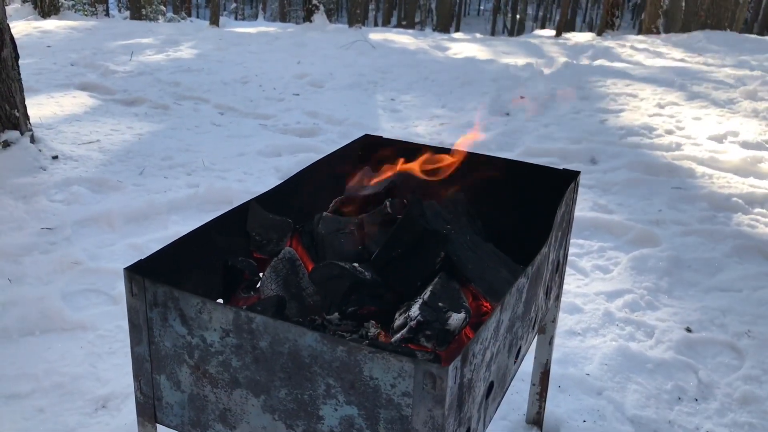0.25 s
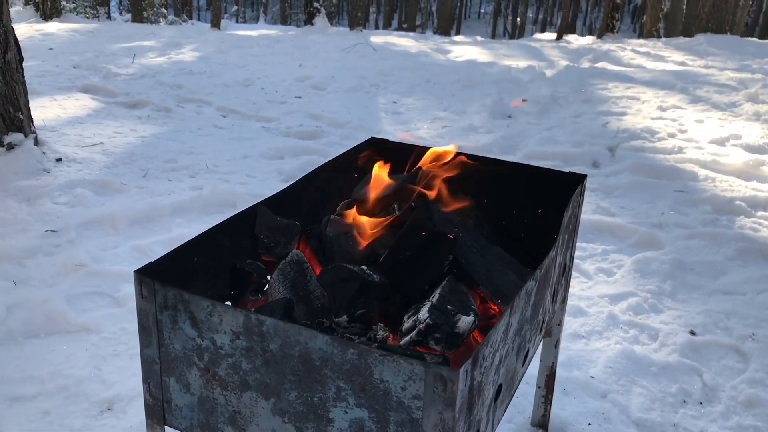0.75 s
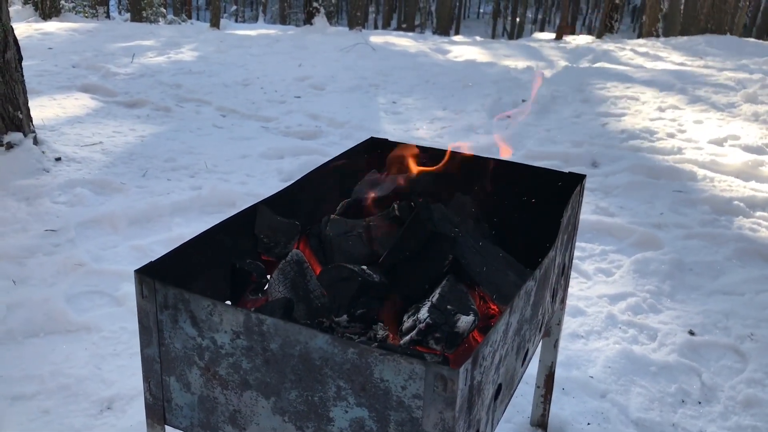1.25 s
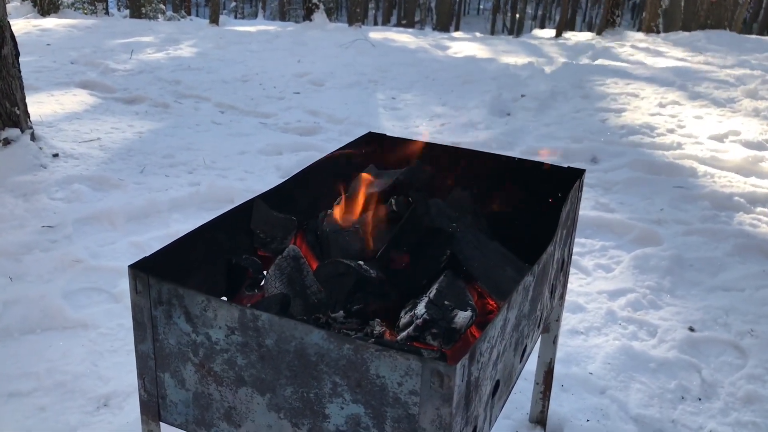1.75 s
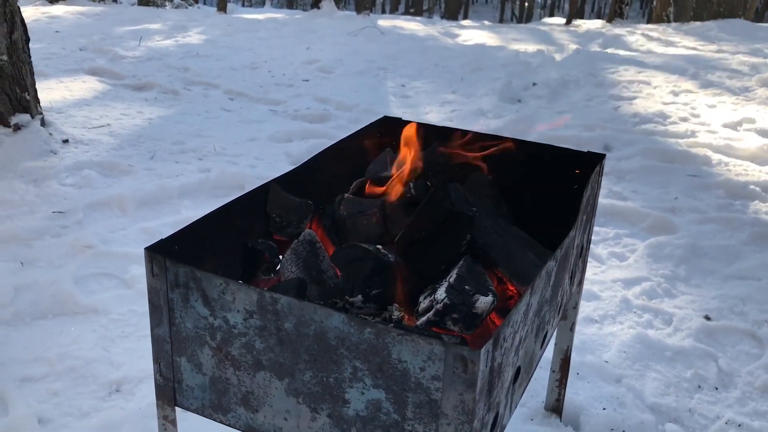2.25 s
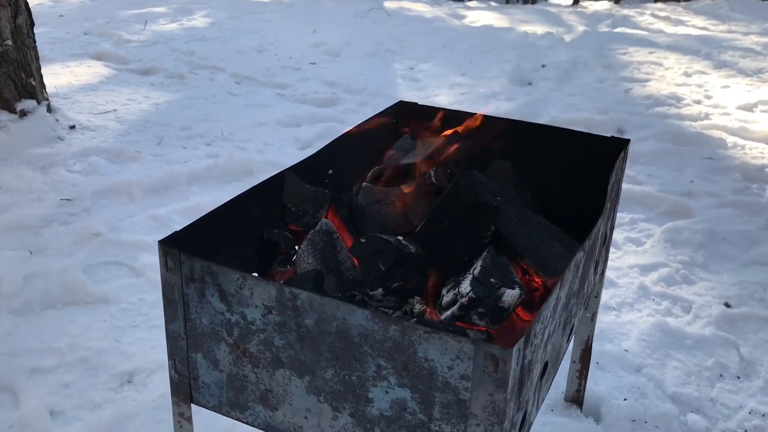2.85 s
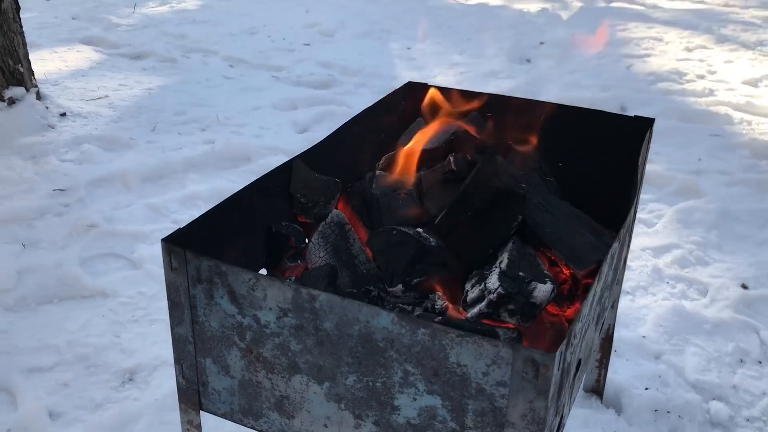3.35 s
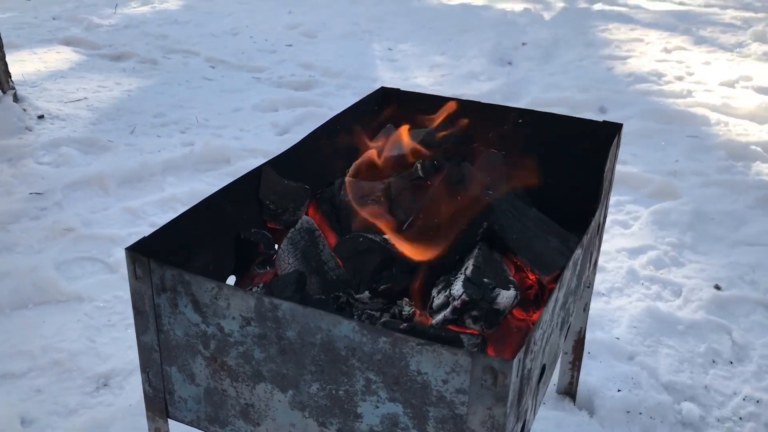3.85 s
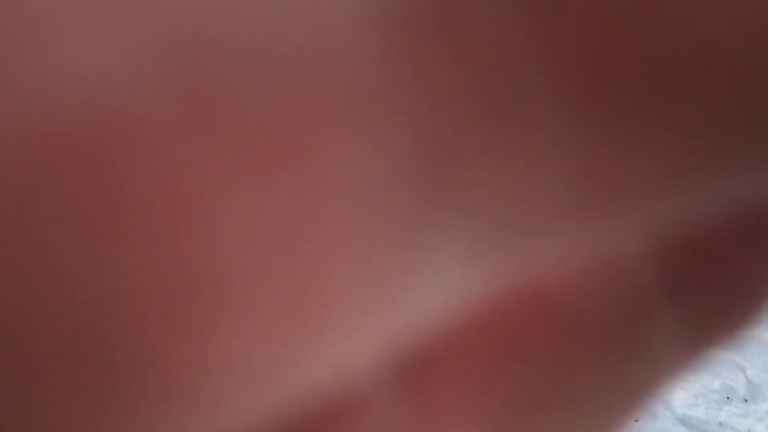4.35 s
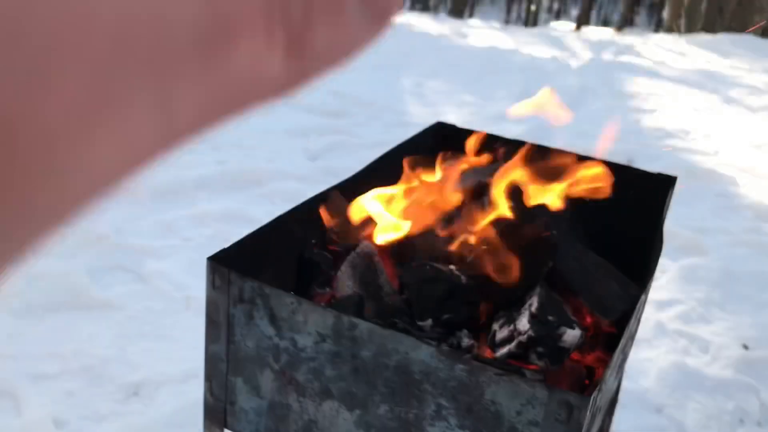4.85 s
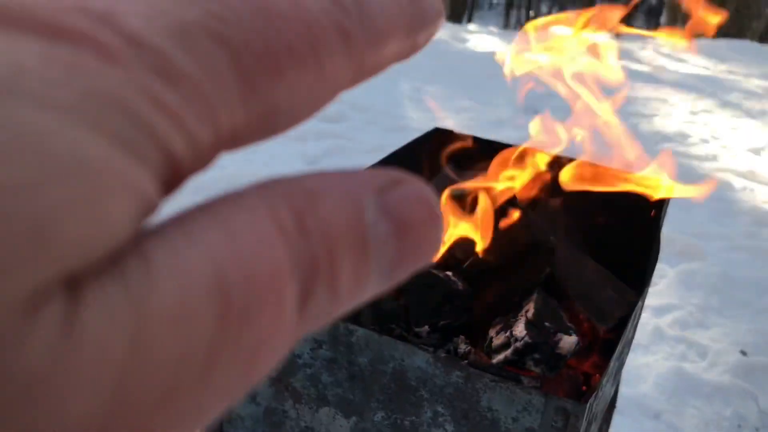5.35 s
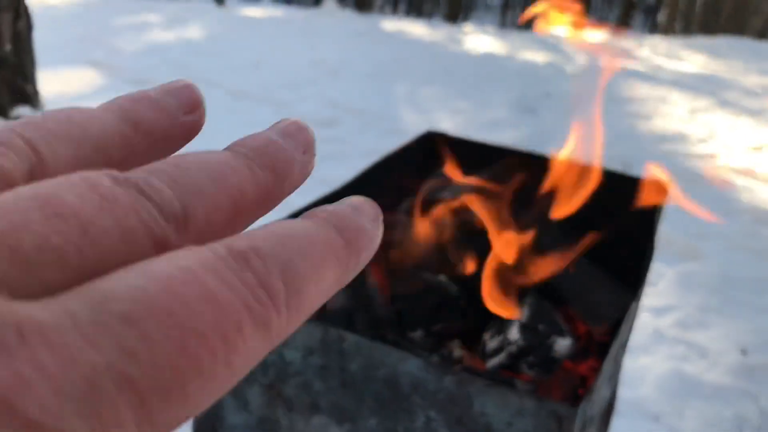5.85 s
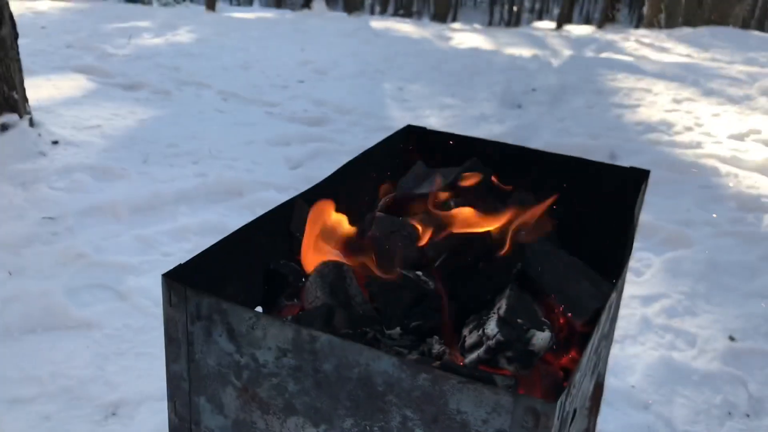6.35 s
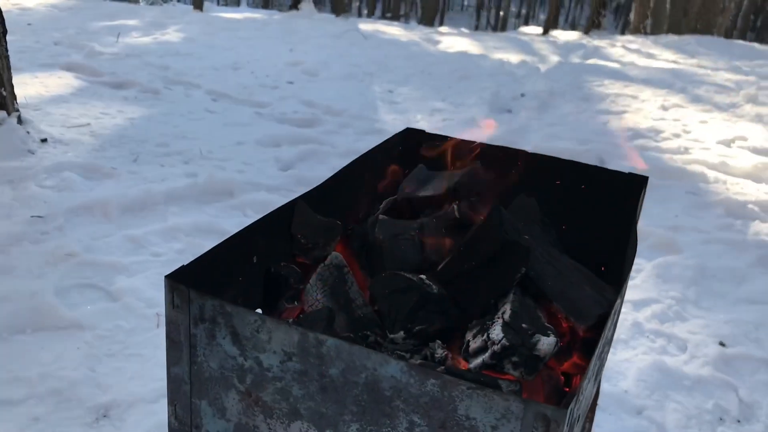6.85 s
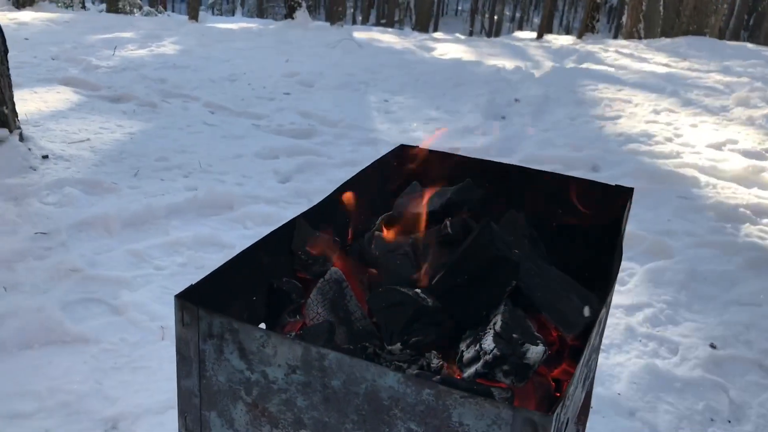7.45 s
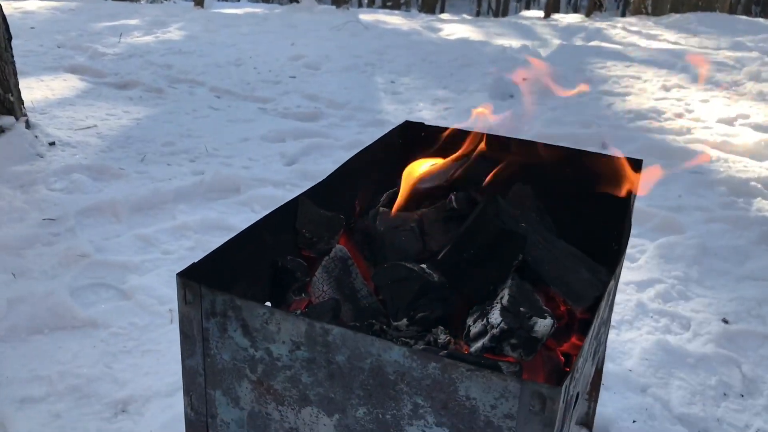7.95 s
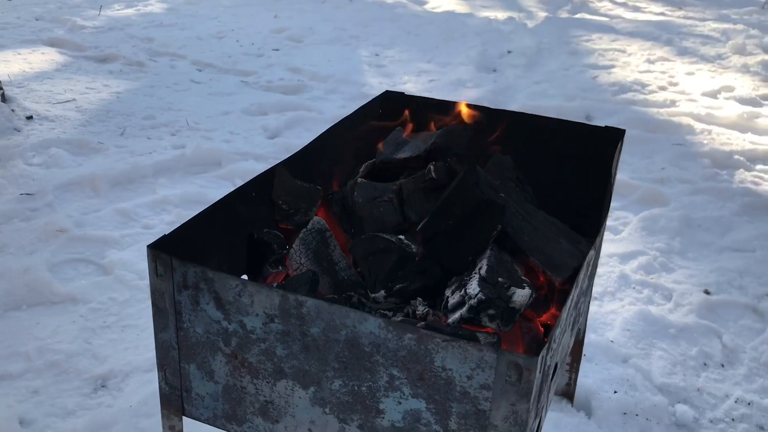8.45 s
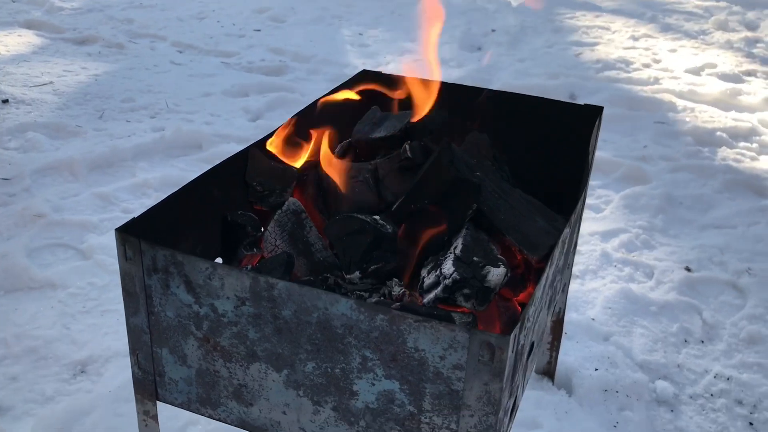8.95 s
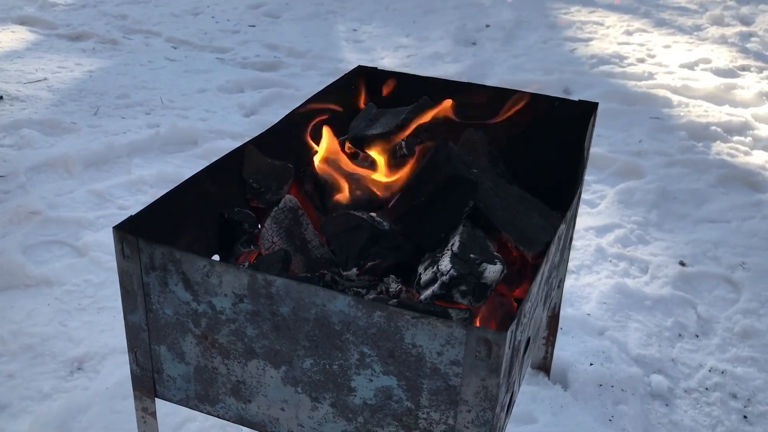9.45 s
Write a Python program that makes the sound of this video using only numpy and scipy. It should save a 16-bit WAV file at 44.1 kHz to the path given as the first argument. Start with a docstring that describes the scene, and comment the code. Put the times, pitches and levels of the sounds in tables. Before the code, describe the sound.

Embers fizz and snap in a metal grill in the open, with soft wind, a brief nylon rustle, clunking coals and fingers bumping the microphone.

```python
"""Charcoal burns in a steel grill in a snowy forest. From the start embers fizz, flames flutter in a light wind
and coals pop and crack, fiercest near 0.9 s, then thinning: noise bursts excite damped modes of coal.
Flakes ring faintly throughout as decaying sines, more clearly from 5.6 s. Puffs of air reach the microphone
from 1.1 s; from 2.5 s a nylon sleeve swishes and sings (noise, blurred sines). Coals knock from 3.2 s and
fingers bump the microphone from 4.4 s, as struck modes; one falling sine whoops at 6.3 s."""
import sys
import numpy as np
from scipy import signal
from scipy.fft import rfft, irfft, next_fast_len
from scipy.io import wavfile
from scipy.ndimage import uniform_filter1d, map_coordinates

SR = 44100
rng = np.random.default_rng(int(sys.argv[2]) if len(sys.argv) > 2 else 0)


def generate_wav(signal):
    """Clip the signal to [-1, 1] and save it as 16-bit WAV at the path in sys.argv[1]."""
    frames = np.transpose(np.atleast_2d(signal))
    scaled = np.clip(frames, -1, 1) * 32767
    pcm = np.round(scaled).astype(np.int16)
    wavfile.write(sys.argv[1], SR, pcm)


N = 427329
TIME = np.arange(N) / SR
TOP_HZ = 16200  # upper band edge

# ember fizz: initial level, fade, edge time of a gas jet
GLOW_DB, COOL_DB_PER_S, JET_EDGE_S = -46.5, 0.92, 0.013
# fierce spell: middle, time from there to 1/e, snaps per second added at the middle, snaps per second always
SPELL_S, SPELL_HALF_S, SPELL_RATE_HZ, CALM_RATE_HZ = 0.88, 0.52, 60, 9
# median snap decay in mid-spell; decay of the rattle between the grill walls
SPELL_T60_S, WALLS_T60_S = 0.0013, 0.016

# gas jets opening in the embers: start_s, end_s, rise_db
GAS_JETS = [(0.903, 1.36, 2.5), (1.843, 2.032, 6.5), (2.49, 2.88, 5), (3.086, 3.358, 7),
            (3.627, 3.904, 4.5), (4.25, 4.42, 1), (5.154, 5.498, 1.5), (6.75, 7.6, 2.5)]
# ember fizz spectrum: freq_hz, gain_db
FIZZ_SPECTRUM = [(200, -42), (800, 3), (1500, 1.5), (2800, 2), (6000, -1.5), (9500, -1.5), (12000, 0.5),
                 (16000, -5)]
# wind and draught over the grill: time_s, level_db
WIND_LEVEL = [(0.0, -41), (0.35, -40.5), (0.8, -47), (1.17, -34.5), (1.45, -42.5), (2.3, -42), (2.6, -44.5),
              (3.6, -36.5), (4.22, -43.5), (4.6, -33.5), (5.25, -37), (5.9, -28), (6.03, -43), (6.6, -46.5),
              (7.35, -39), (8.0, -45.5), (9.4, -36), (9.69, -43)]
# lapping flames: time_s, level_db
LAPPING_LEVEL = [(0.0, -50.5), (0.54, -51.5), (0.86, -54.5), (1.13, -48.5), (2.24, -54), (2.56, -46.5),
                 (3.13, -51), (3.34, -47), (4.29, -52), (4.61, -47.5), (7.47, -50.5), (7.85, -54.5),
                 (8.91, -52), (9.69, -49.5)]
# wind rumble spectrum: freq_hz, gain_db
RUMBLE_SPECTRUM = [(15, -30), (25, -39), (40, -0.5), (62, -1.5), (100, -4.5), (160, -9.5), (260, -29.5),
                   (600, -41), (2000, -75)]
# flame flutter spectrum: freq_hz, gain_db
FLUTTER_SPECTRUM = [(60, -39), (160, 3), (250, 1), (400, -1), (600, -5), (900, -11), (1500, -16),
                    (3000, -33), (9000, -38)]
# loud splits of coal: start_s, level_db, ring_hz, t60_s, body_db
COAL_CRACKS = [(0.0538, -31.5, 13900, 0.0057, 20), (0.301, -24, 6000, 0.00074, 0),
               (0.334, -34, 9700, 0.0026, -13), (0.4078, -18.5, 13900, 0.0026, 8),
               (0.4275, -17, 13200, 0.0015, -9), (0.4406, -19, 12400, 0.0014, 4),
               (0.4692, -17.5, 12000, 0.0015, -12), (0.488, -25, 11800, 0.024, -5),
               (0.4932, -22, 13000, 0.0019, -1), (0.5036, -8, 12300, 0.002, 6),
               (0.533, -18, 11400, 0.0011, -14), (0.6196, -28.5, 6800, 0.002, -6),
               (0.6329, -20.5, 12500, 0.0032, -18), (0.661, -18, 11400, 0.0054, -14),
               (0.6738, -15.5, 12500, 0.0053, -12), (0.8118, -13.5, 10600, 0.012, 0),
               (0.8735, -36, 7900, 0.01, -15), (0.9212, -19.5, 13600, 0.013, -14),
               (0.9534, -36.5, 6400, 0.003, 12), (0.994, -27, 6300, 0.0018, -3),
               (1.0121, -17.5, 11700, 0.0056, -29), (1.0171, -26, 9000, 0.0016, 1),
               (1.0279, -28, 2130, 0.0041, 6), (1.0345, -15.5, 15400, 0.0032, -3),
               (1.0485, -30, 6000, 0.002, 14), (1.0823, -31.5, 2900, 0.003, 10.5),
               (1.104, -32, 14200, 0.0016, 5), (1.134, -33.5, 2200, 0.0068, 8.5),
               (1.2077, -27, 2320, 0.027, 4.5), (1.2905, -34, 6460, 0.0048, 14),
               (1.3459, -35, 11600, 0.002, 10), (1.3808, -25.5, 14700, 0.0018, -3),
               (1.5187, -35, 13900, 0.0046, 8.5), (1.6463, -26, 14500, 0.00086, -19),
               (1.6955, -29.5, 5950, 0.00089, 9), (1.8328, -35, 14600, 0.0022, 5),
               (1.9407, -19, 6600, 0.0021, -26), (2.2974, -30.5, 13400, 0.0023, 2),
               (2.3212, -33.5, 6900, 0.0057, 3), (2.426, -36.5, 7850, 0.02, -7),
               (2.5863, -34.5, 14500, 0.0089, 14), (2.75, -19.5, 11300, 0.009, -2),
               (2.8933, -27.5, 15700, 0.003, -15), (3.7692, -31, 13700, 0.012, -12),
               (3.7993, -29.5, 10900, 0.0082, -6), (4.1068, -23, 4420, 0.014, 3),
               (4.1069, -24, 12000, 0.0043, -4), (4.2005, -33, 6140, 0.023, -3),
               (4.3375, -38, 14900, 0.0027, 7), (4.8542, -37, 2980, 0.0048, -13),
               (5.1897, -40, 14600, 0.022, -10), (5.3154, -34, 11600, 0.006, -17),
               (5.3429, -39, 8800, 0.018, -11), (5.361, -27, 13600, 0.0099, -15),
               (5.3973, -35, 13000, 0.011, -11), (5.4604, -30.5, 14000, 0.00087, -15),
               (5.561, -19, 8200, 0.013, -16), (5.7504, -35, 13900, 0.0012, 6.5),
               (5.7881, -35, 5330, 0.01, 16.5), (6.7886, -40, 12400, 0.009, -13),
               (6.941, -37, 12800, 0.036, -2), (7.3838, -38.5, 5370, 0.023, -13),
               (7.426, -36, 7640, 0.017, -20), (8.1037, -38, 13300, 0.0048, -16),
               (8.3561, -33, 7250, 0.0069, 9.5), (8.476, -42, 12900, 0.036, -4),
               (8.8804, -26.5, 11000, 0.0026, -24), (8.9575, -42, 9700, 0.014, -11),
               (9.3391, -38, 7340, 0.029, -9), (9.3725, -33, 14700, 0.014, 0),
               (9.5389, -37, 8000, 0.011, -16)]
# bursting gas pockets: start_s, level_db, wave_scale_s
GAS_POPS = [(.2336, 14, 0.000066), (0.388, 17.5, 0.00006), (.4150, 9.5, 0.000093), (1.2361, 12, 0.000045),
            (1.3391, 17.5, 0.000075)]
# tail scattered by tree trunks: freq_hz, t60_s
FOREST_DECAY = [(200, 0.043), (1500, 0.36), (6000, 0.31), (15000, 0.11)]
# puffs of air on the microphone: centre_s, level_db, pitch_hz, length_s
AIR_PUFFS = [(1.078, -37, 89, 0.024), (1.79, -34, 74.5, 0.017), (2.319, -35.5, 74.5, 0.014),
             (3.281, -44, 104, 0.013), (4.053, -29.0, 58, 0.028), (4.67, -25.0, 80, 0.018),
             (4.865, -31, 73.6, 0.011), (5.178, -22.5, 64.6, 0.011), (5.52, -15.5, 77, 0.0079),
             (5.822, -22.5, 71, 0.019), (6.732, -35.0, 59, 0.019), (8.06, -29, 59, 0.0084),
             (8.493, -23.5, 81, 0.0053), (8.729, -37, 65, 0.03), (9.088, -35, 81, 0.015),
             (9.392, -24, 78.5, 0.0062)]
# flapping tongues of flame: centre_s, level_db, centre_hz
FLAME_FLAPS = [(2.351, -41, 398), (6.753, -41, 475), (7.099, -42, 420), (7.498, -50.5, 970),
               (7.861, -46, 870), (8.06, -49, 534), (8.679, -45, 384), (9.059, -41, 260), (9.469, -41, 385)]
# jacket sleeve strokes: peak_s, level_db, swell_s, fade_s
SLEEVE_STROKES = [(2.66, -37.5, 0.14, 0.18), (3.29, -47.5, 0.13, 0.06), (3.77, -41.5, 0.11, 0.11),
                  (4.33, -52.5, 0.26, 0.13), (6.12, -36.5, 0.065, 0.17), (7.22, -50, 0.075, 0.12),
                  (7.51, -50.5, 0.047, 0.057), (7.86, -53.5, 0.04, 0.055)]
# nylon swish spectrum: freq_hz, gain_db
NYLON_SPECTRUM = [(150, -28), (500, -12), (900, -3), (1400, 1), (2000, -3.5), (2800, -7.5), (3500, -3.5),
                  (6000, -8), (9000, -7.5), (12000, -14), (16000, -18)]
# singing weave, one list per sung glide: time_s, pitch_hz, level_db
WEAVE_GLIDES = [
    [(2.47, 980, -55), (2.59, 1130, -43.5), (2.65, 1400, -41.5), (2.71, 1480, -51), (2.78, 1250, -62)],
    [(6.05, 850, -48), (6.11, 1150, -42), (6.17, 1400, -48), (6.225, 1100, -43.5), (6.27, 950, -66)],
    [(6.33, 1600, -53), (6.41, 1500, -54), (6.47, 1470, -60)],
]
# folds of cloth sliding at different speeds: pitch_ratio, level_db
CLOTH_FOLDS = [(1, 3.5), (1.17, -5), (1.4, -9), (0.87, -12)]
# coals knocking in the firebox: start_s, level_db, centre_hz
COAL_KNOCKS = [(3.225, -29, 600), (3.271, 1, 1500), (3.363, -5.5, 2150), (3.441, -27, 1420),
               (3.682, -9, 1000), (3.751, -28.5, 400)]
# firebox modes: freq_hz, width_hz, gain_db
FIREBOX_MODES = [(720, 66, 8.5), (830, 170, 5), (1320, 130, 1), (1500, 140, -5), (1810, 67, -7),
                 (2060, 73, -5), (2600, 1400, -1), (3700, 140, -1), (4470, 440, 1.5), (5700, 520, -9)]
# fingers bumping the microphone casing: start_s, level_db, centre_hz
FINGER_BUMPS = [(4.436, -21.5, 195), (4.546, -14.5, 1240), (4.550, -11, 1070), (4.553, -13.5, 340),
                (4.569, -22.5, 302), (4.68, -32.5, 396), (4.738, -21.5, 640), (4.86, -24, 523),
                (5.026, -19.5, 610), (5.031, -21.5, 1300), (5.15, -31, 517), (5.435, -29.5, 700),
                (5.795, -21, 219)]
# casing modes: freq_hz, width_hz, gain_db
CASING_MODES = [(173, 66, 1), (260, 66, -0.5), (339, 25, 2), (586, 47, -7), (866, 75, -6.5),
                (1130, 45, -13), (1400, 48, -15), (2040, 53, -33)]
# clearly ringing flakes: start_s, level_db, pitch_hz, t60_s
FLAKE_PINGS = [(5.561, -3, 9600, 0.0072), (6.2407, -27, 5450, 0.03), (6.495, -43, 2600, 0.06),
               (7.16, -37.5, 6000, 0.043), (7.426, -37, 5850, 0.028), (8.8808, -13, 6820, 0.007)]
# falling whoop: time_s, pitch_hz, level_db
WHOOP_GLIDE = [(6.255, 243, -55), (6.28, 232, -29), (6.3, 229, -26), (6.325, 186, -33), (6.37, 157, -50)]
# microphone response: freq_hz, gain_db
MIC_RESPONSE = [(4300, 1), (4900, 0), (5400, 2.5), (6700, 2.5), (7700, 1), (9000, 2), (9800, 2),
                (10500, -0.5), (11400, 2.5), (15500, 3.5), (16500, -1.5)]


def amp(db):
    """Decibels to gain."""
    return 10 ** (np.asarray(db) / 20)


def unit(x):
    """Scale to rms 1."""
    return x / np.sqrt(np.mean(x ** 2) + 1e-20)


def along(points, hz):
    """Interpolate (Hz, value) points on a log-frequency axis."""
    f, v = np.transpose(points)
    return np.interp(np.log(hz + 1), np.log(f + 1), v)


def curves(rows):
    """One value per sample for each column after the time."""
    s, *cols = np.transpose(rows)
    return [np.interp(TIME, s, c) for c in cols]


def during(rows):
    """Soft gate, open over the time span of a table."""
    is_open = (TIME > rows[0][0]) & (TIME < rows[-1][0])
    return uniform_filter1d(1.0 * is_open, size=600)


def wobble(rate_hz):
    """Smooth random curve with rate_hz knots per second."""
    coarse = TIME[::16]
    knots = rng.standard_normal(int(N * rate_hz / SR) + 4)
    return np.interp(TIME, coarse, map_coordinates(knots, [coarse * rate_hz]))


def swell(s, length_s):
    """Gaussian bump of height 1 at s seconds."""
    return np.exp(-((TIME - s) / length_s) ** 2)


def filtered(x, response):
    """Apply a complex response of frequency."""
    m = next_fast_len(len(x) + 2048)
    return irfft(rfft(x, m) * response(np.fft.rfftfreq(m, 1 / SR)), m)[:len(x)]


def coloured(x, spectrum):
    """Minimum-phase filter with the gain of (Hz, dB) points."""
    gain = amp(along(spectrum, np.fft.rfftfreq(8192, 1 / SR)))
    cepstrum = irfft(np.log(gain))
    fold = np.r_[1, np.full(4095, 2), 1, np.zeros(4095)]  # folding the cepstrum makes it causal
    impulse = irfft(np.exp(rfft(cepstrum * fold)))
    return signal.fftconvolve(x, impulse)[:len(x)]


def noise(spectrum):
    """Coloured noise of rms 1."""
    return unit(coloured(rng.standard_normal(N), spectrum))


def resonance(f, hz, width_hz):
    """Response of one damped mode, 1 at its centre."""
    return 1j * f * width_hz / (hz * hz - f * f + 1j * f * width_hz)


def add(track, s, sound):
    """Mix a sound into the track at s seconds."""
    part = track[max(round(s * SR), 0):][:len(sound)]
    part += sound[:len(part)]


def burst(t, t60_s, spike):
    """Fracture: one sharp spike plus a dying spray of noise."""
    spray = rng.standard_normal(len(t)) * amp(-60 * t / max(t60_s, 1e-3))
    return spray / np.linalg.norm(spray) + spike * (t == 0)


def glow():
    """Ember level in dB: a steady fade, raised while gas jets are open."""
    level_db = GLOW_DB - COOL_DB_PER_S * TIME
    for start, end, rise_db in GAS_JETS:
        opening = np.tanh((TIME - start) / JET_EDGE_S)
        closing = np.tanh((TIME - end) / JET_EDGE_S)
        level_db = level_db + rise_db * (opening - closing) / 2
    return level_db


def embers(rate_hz=900, spread_db=-1.5, tick_db=-7, hiss_db=-2, spurt_db=12.0):
    """Countless tiny splits tick over gas that escapes in spurts of a few milliseconds."""
    chance, size = rng.random(N), rng.exponential(size=N)
    splits = (chance < rate_hz / SR) * amp(spread_db * size)
    decay = np.exp(-1 / (SR * 0.00076))  # time constant 0.76 ms
    spray = signal.lfilter([1], [1, -decay], splits) * rng.standard_normal(N)
    ticks = unit(coloured(spray, FIZZ_SPECTRUM + [(17500, -33)]))
    gas = noise(FIZZ_SPECTRUM + [(17500, -23)])
    pores = np.zeros(N)
    for hz in (3970, 5950, 9000, 13000):  # each pore size spurts independently
        pores += filtered(gas, lambda f: resonance(f, hz, hz / 3)) * amp(spurt_db * wobble(180))
    hiss = unit(gas + unit(pores)) * amp(3.2 * wobble(25))
    return amp(glow()) * (amp(tick_db) * ticks + amp(hiss_db) * hiss)


def flames(rumble_db=-2.0, flutter_db=1.0):
    """Low wind rumble and quicker flame flutter share one random lapping."""
    (wind_db,), (lapping_db,) = curves(WIND_LEVEL), curves(LAPPING_LEVEL)
    lap = wobble(22)
    rumble = unit(noise(RUMBLE_SPECTRUM) * amp(4.7 * lap))
    flutter = unit(noise(FLUTTER_SPECTRUM) * amp(2.0 * lap + 2.9 * wobble(70)))
    return amp(wind_db + rumble_db) * rumble + amp(lapping_db + flutter_db) * flutter


def tinkles(count=260, centre_hz=6200, octaves=0.94, t60_s=0.026, level_db=-55, spread_db=3.5):
    """Flakes of cooling charcoal ring faintly as decaying sines of random pitch."""
    out, t = np.zeros(N), np.arange(SR // 20) / SR
    for _ in range(count):
        pitch, life = rng.standard_normal(2)
        size = min(rng.exponential(), 3.5)
        hz = min(centre_hz * 2 ** (octaves * pitch), TOP_HZ)
        ring = np.sin(2 * np.pi * hz * t) * amp(-60 * t / (t60_s * np.exp(0.49 * life)))
        add(out, rng.random() * N / SR, amp(level_db + spread_db * size) * ring)
    return out


def split(t60_s, hz, body_db, ring_cycles=0.9, ring_growth_hz=240, broad_db=-8, walls_db=-19):
    """One split rings its piece of coal briefly and rattles between the grill walls."""
    t = np.arange(SR // 25) / SR
    snap = burst(t, t60_s, spike=0.88) + amp(walls_db) * burst(t, WALLS_T60_S, spike=0)
    width_hz = hz / (ring_cycles + ring_growth_hz * t60_s)  # longer splits have a clearer pitch

    def coal(f):
        """Narrow ring over a broad mode, cut at the band edge."""
        return (resonance(f, hz, width_hz) + amp(broad_db) * resonance(f, 6500, 14000)) * (f < TOP_HZ)

    bright = filtered(snap, coal)
    low = filtered(snap, lambda f: resonance(f, 970, 1570)) * amp(body_db)
    # bright part: rms 1 over 5 ms
    return (bright + low) * np.sqrt(SR / 200) / np.linalg.norm(bright)


def snaps(level_db=-42, fade_db_per_s=0.5, spread_db=3, spell_db=6, centre_hz=11500, octaves=0.59,
          calm_t60_s=0.017, body_db=-15, spell_body_db=11, body_spread_db=4):
    """Small splits come at random; in the fierce spell they are denser, louder, drier and fuller."""
    out, spell = np.zeros(N), swell(SPELL_S, SPELL_HALF_S)
    typical_db = level_db - fade_db_per_s * TIME + spell_db * spell
    expected = np.cumsum(CALM_RATE_HZ + SPELL_RATE_HZ * spell) / SR  # mean count so far
    traits = np.clip(rng.standard_normal((400, 4)), -2, 2)
    for k, (size, pitch, life, body) in enumerate(traits):
        i = np.searchsorted(expected, k + rng.uniform(0, 2))
        if i < N:
            typical_t60_s = calm_t60_s * (SPELL_T60_S / calm_t60_s) ** np.sqrt(spell[i])
            hz = min(centre_hz * 2 ** (octaves * pitch), TOP_HZ)
            low_db = body_db + spell_body_db * spell[i] + body_spread_db * body
            snap = split(typical_t60_s * np.exp(life / 2), hz, low_db)
            add(out, i / SR, amp(typical_db[i] + spread_db * size) * snap)
    return out


def splinters(count=5, spread_s=0.039, below_db=-26.5, scatter_db=3, t60_s=0.0018, parent_db=-30):
    """Around each strong crack the stressed coal gives a few smaller snaps."""
    out, t = np.zeros(N), np.arange(SR // 100) / SR
    for s, db, *_ in COAL_CRACKS:
        if db <= parent_db:
            continue
        for when, size in rng.standard_normal((count, 2)):
            level_db = min(db, -23) + below_db + scatter_db * np.clip(size, -2, 1.5)
            snap = np.sqrt(SR / 200) * burst(t, t60_s, spike=0.31)
            add(out, s + spread_s * when, amp(level_db) * snap)
    return coloured(out, FIZZ_SPECTRUM + [(17500, -24)])


def cracks(body_trim_db=-9):
    """Loud splits, each ringing its own piece of coal."""
    out = np.zeros(N)
    for s, db, hz, t60_s, body_db in COAL_CRACKS:
        add(out, s, amp(db) * split(t60_s, hz, body_db + body_trim_db))
    return out


def pops(fade_s=0.075, spray_db=-3):
    """A gas pocket bursts: a spray of grit and a pressure wave whose swings slow down as they die."""
    out, t = np.zeros(N), np.arange(SR // 25) / SR
    for s, db, scale_s in GAS_POPS:
        age = 1 + t / scale_s
        blast = -np.sin(3.35 * np.log(age)) / age * np.exp(-t / fade_s)
        spray = burst(t, .0045, spike=0) + .15 * burst(t, .025, spike=0)
        add(out, s, amp(db) * (blast + amp(spray_db) * spray))
    return out


def forest(x):
    """Tree trunks scatter a faint tail, decaying noise by band; the snow swallows the rest."""
    hz, t, z = signal.stft(rng.standard_normal(SR // 2), SR, nperseg=256)
    decay = amp(-60 * t / along(FOREST_DECAY, hz)[:, None])
    tail = signal.istft(z * decay, SR, nperseg=256)[1]
    delayed = np.pad(x, (300, 0))  # 7 ms
    return signal.fftconvolve(delayed, tail / np.linalg.norm(tail))[:N]


def puffs(trim_db=-2):
    """A puff of air pushes on the microphone for a few slow swings."""
    out, t = np.zeros(N), np.arange(-SR // 10, SR // 10) / SR
    for s, db, hz, length_s in AIR_PUFFS:
        swing = np.sin(2 * np.pi * (hz * t + rng.random()))
        add(out, s + t[0], amp(db + trim_db) * np.exp(-(t / length_s) ** 2) * swing)
    return out


def flaps(trim_db=-1, length_s=0.015):
    """A tongue of flame tears off with a short, dull puff of band-passed noise."""
    out, t = np.zeros(N), np.arange(-SR // 20, SR // 20) / SR
    for s, db, hz in FLAME_FLAPS:
        puff = unit(filtered(rng.standard_normal(len(t)), lambda f: resonance(f, hz, hz) ** 2))
        add(out, s + t[0], amp(db + trim_db) * puff * np.exp(-(t / length_s) ** 2))
    return out


def sleeve(sing_db=-2, blur_hz=60):
    """Nylon rubs on nylon: a swelling broad swish, and fuzzy tones that glide along the weave's pitch curves."""
    rub = np.zeros(N)
    for s, db, rise_s, fade_s in SLEEVE_STROKES:
        away = np.maximum((s - TIME) / rise_s, (TIME - s) / fade_s)
        rub += amp(db) * np.exp(2 * (1 - np.hypot(1, away)))
    out = rub * unit(noise(NYLON_SPECTRUM) * amp(0.47 * wobble(90)))
    hz, sing = np.zeros(N), np.zeros(N)
    for glide in WEAVE_GLIDES:
        gate = during(glide)
        glide_hz, glide_db = curves(glide)
        hz += gate * glide_hz
        sing += gate * amp(glide_db + sing_db)
    for ratio, db in CLOTH_FOLDS:
        phase = 2 * np.pi * np.cumsum(ratio * hz + blur_hz * wobble(500)) / SR
        out += sing * amp(db) * unit(np.sin(phase) * amp(4.3 * wobble(200)))
    return out


def blows(table, modes, contact_t60_s, rattle, rattle_t60_s, direct, breadth, grit_db):
    """Each blow rings a body's modes; contact sets its centre pitch, and a little grit scuffs on top."""
    out, t = np.zeros(N), np.arange(SR // 5) / SR

    def body(f):
        """Sum of modes plus the direct blow."""
        return sum(amp(g) * resonance(f, c, w) for c, w, g in modes) + direct

    for s, db, hz in table:
        blow = burst(t, contact_t60_s, spike=1.0) + rattle * burst(t, rattle_t60_s, spike=0)
        ring = filtered(blow, lambda f: body(f) * resonance(f, hz, breadth * hz) + amp(grit_db))
        add(out, s, amp(db) * ring / np.abs(ring).max())
    return out


def knocks():
    """Knocking coals strike the firebox modes."""
    return blows(COAL_KNOCKS, FIREBOX_MODES, contact_t60_s=0.01, rattle=0.88, rattle_t60_s=0.044,
                 direct=0.64, breadth=0.85, grit_db=-43)


def bumps():
    """Fingers strike the modes of the microphone casing."""
    return blows(FINGER_BUMPS, CASING_MODES, contact_t60_s=0.021, rattle=1.0, rattle_t60_s=0.067,
                 direct=0.19, breadth=0.77, grit_db=-35)


def pings(attack_s=0.00027):
    """A larger flake snaps off and rings briefly at one pitch."""
    out, t = np.zeros(N), np.arange(SR // 12) / SR
    for s, db, hz, t60_s in FLAKE_PINGS:
        envelope = amp(db - 60 * t / t60_s) * (1 - np.exp(-t / attack_s))
        add(out, s, envelope * np.sin(2 * np.pi * hz * t))
    return out


def whoop():
    """One soft, hollow, falling whoop: a gliding sine."""
    hz, db = curves(WHOOP_GLIDE)
    return during(WHOOP_GLIDE) * amp(db) * np.sin(2 * np.pi * np.cumsum(hz) / SR)


def scene():
    """The fire and the person beside it, in the open air."""
    fire = embers() + flames()
    crackle = tinkles() + snaps() + splinters() + cracks() + pops() + pings()
    knocking = knocks()
    echo = forest(amp(-33) * crackle + amp(-18) * knocking)
    air = puffs() + flaps()
    person = sleeve() + bumps()
    return (fire + crackle + air + person + knocking + whoop() + echo)[None]


def record(dry):
    """The microphone port colours the treble, the loudest peaks clip, and the band ends steeply."""
    clipped = np.clip(coloured(dry[0], MIC_RESPONSE), -1, 1)
    return filtered(clipped, lambda hz: hz < TOP_HZ)[None]


dry = scene()
out = record(dry)
generate_wav(out)
```